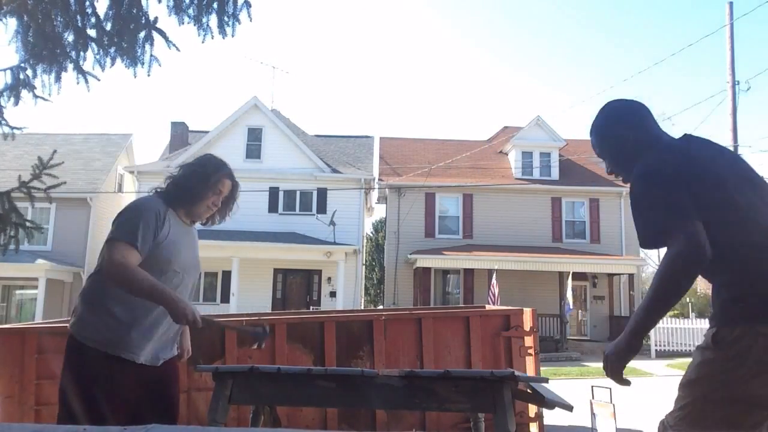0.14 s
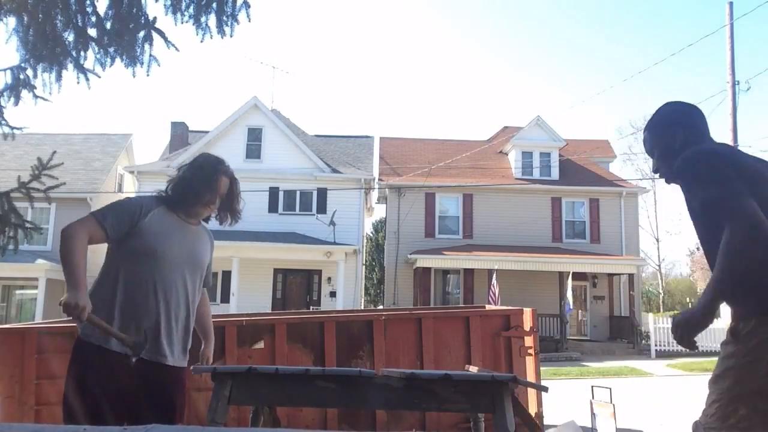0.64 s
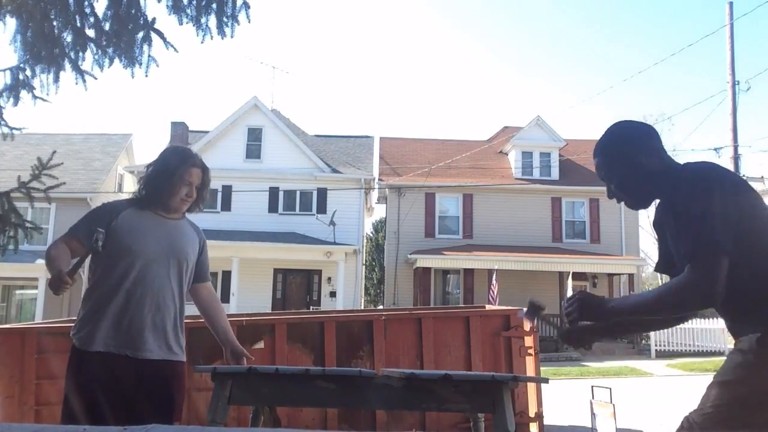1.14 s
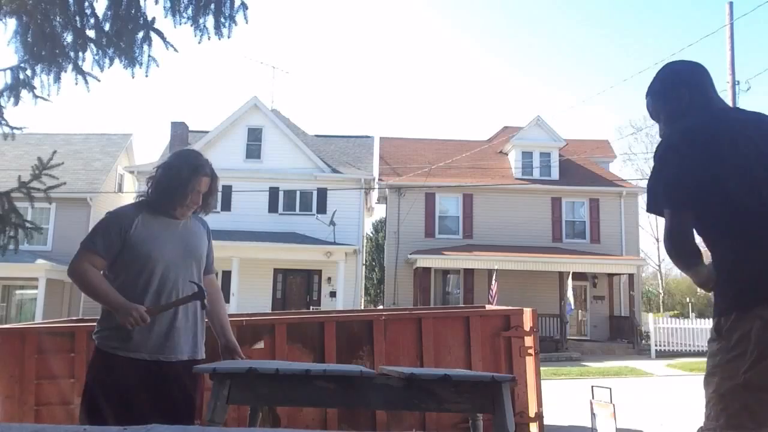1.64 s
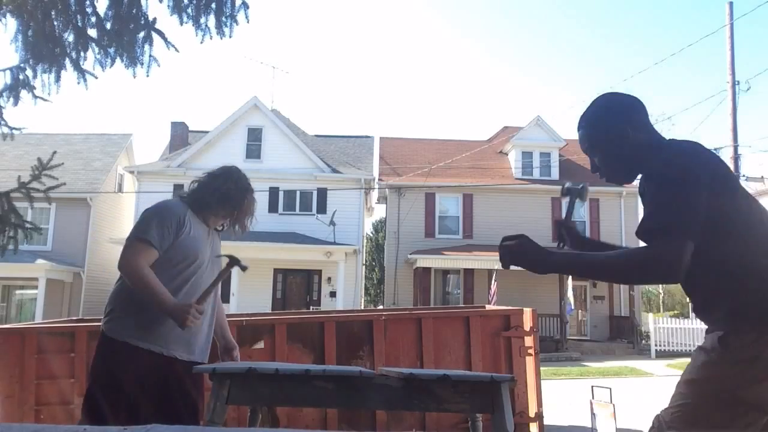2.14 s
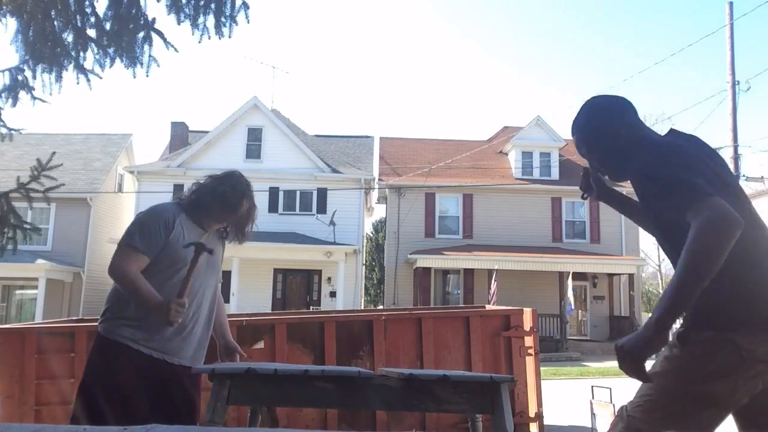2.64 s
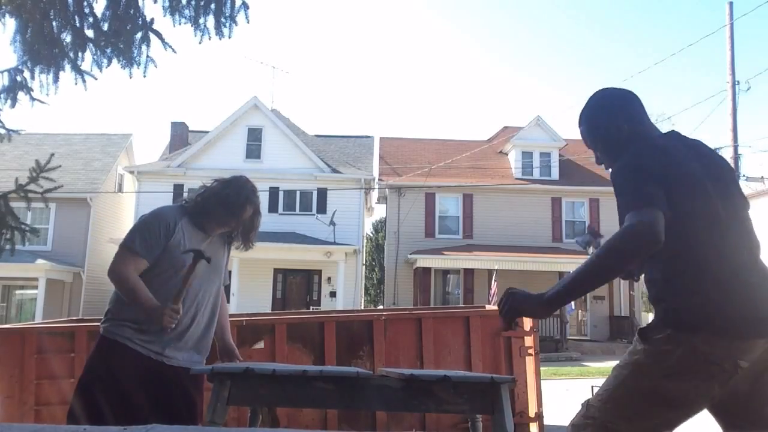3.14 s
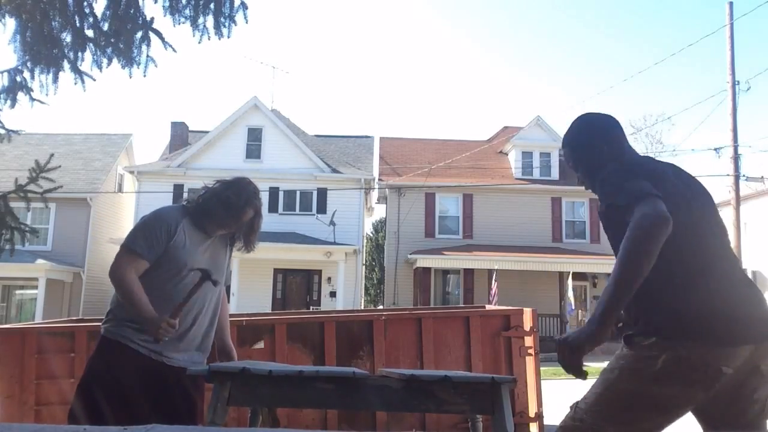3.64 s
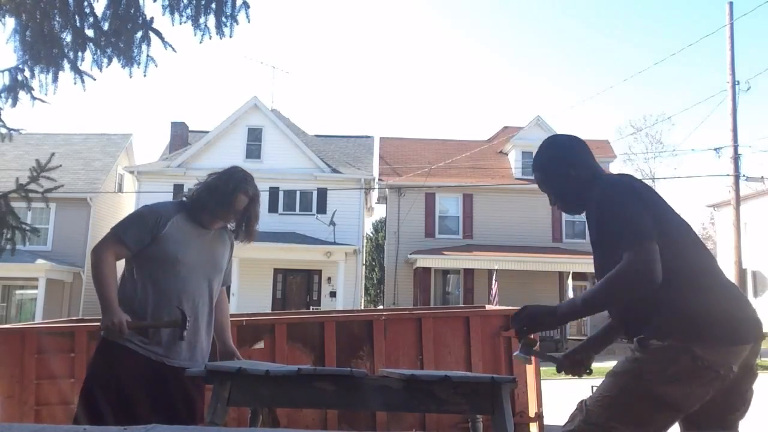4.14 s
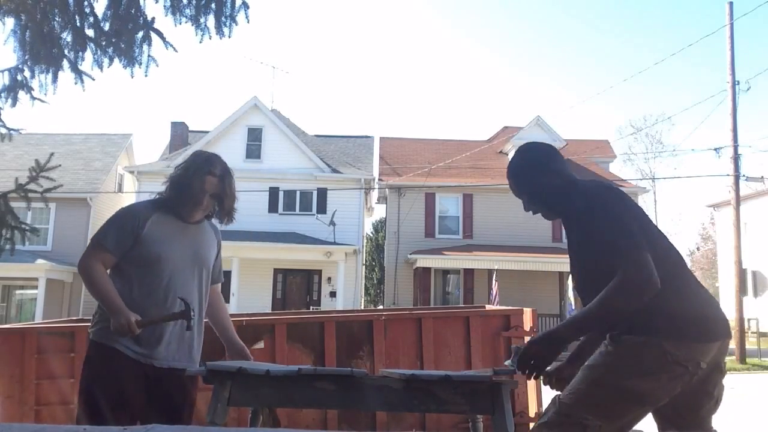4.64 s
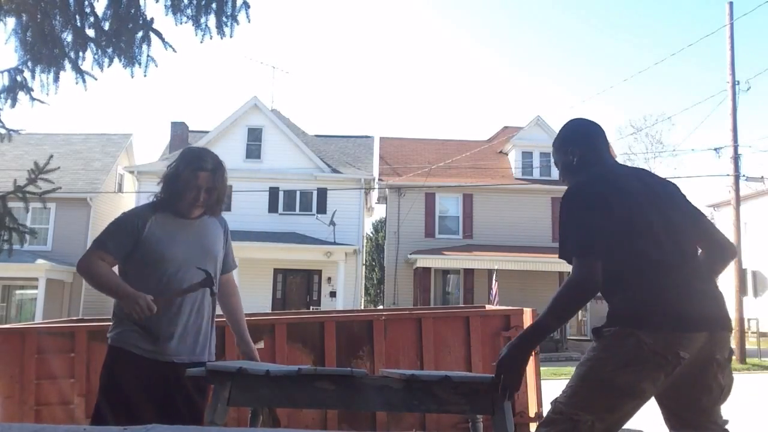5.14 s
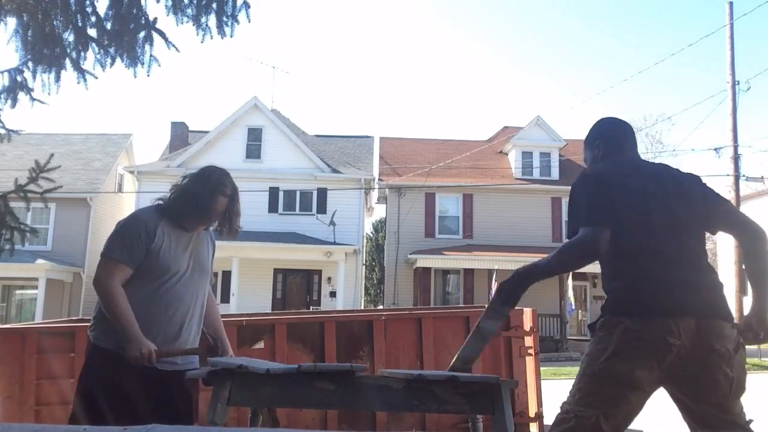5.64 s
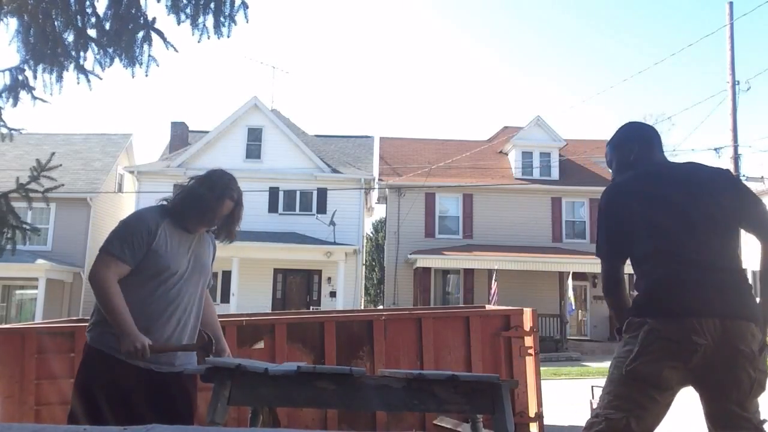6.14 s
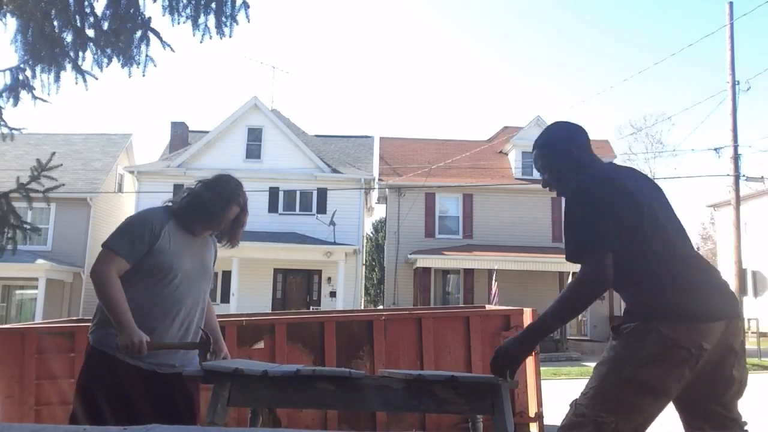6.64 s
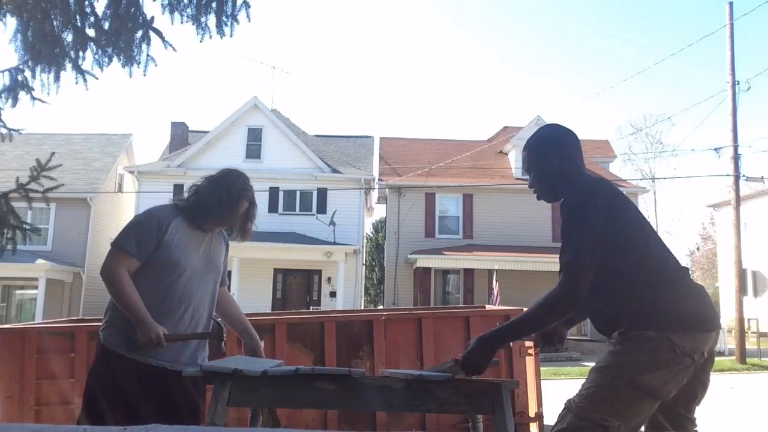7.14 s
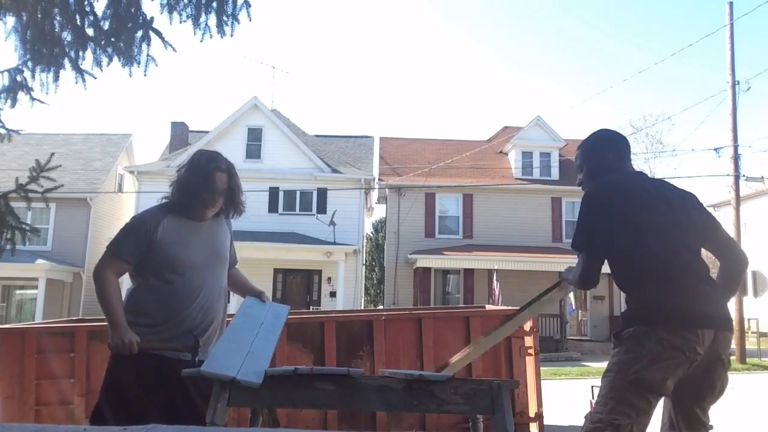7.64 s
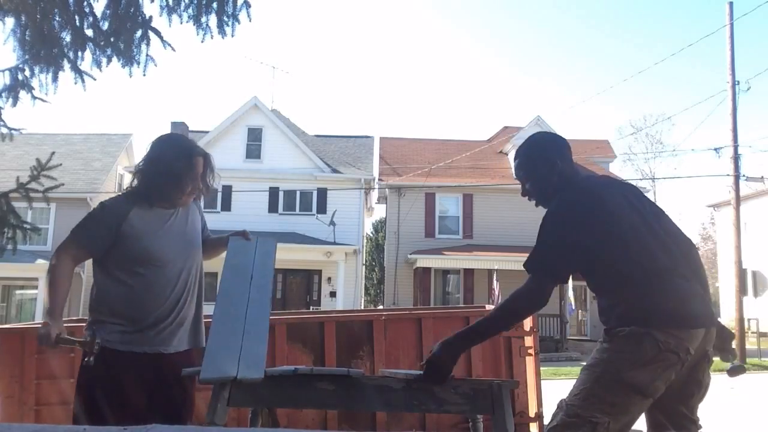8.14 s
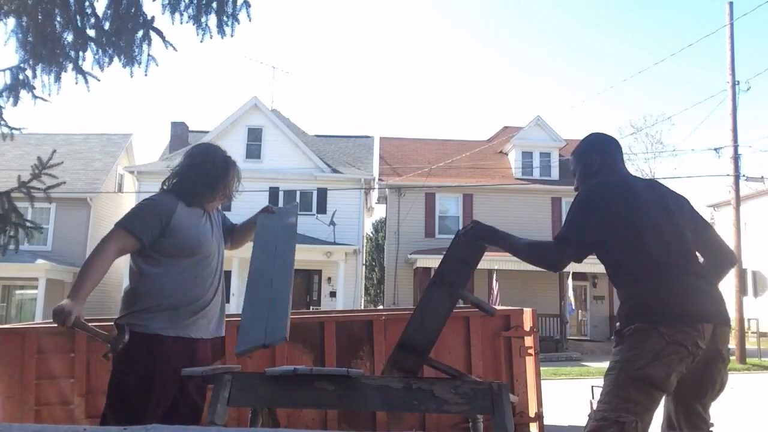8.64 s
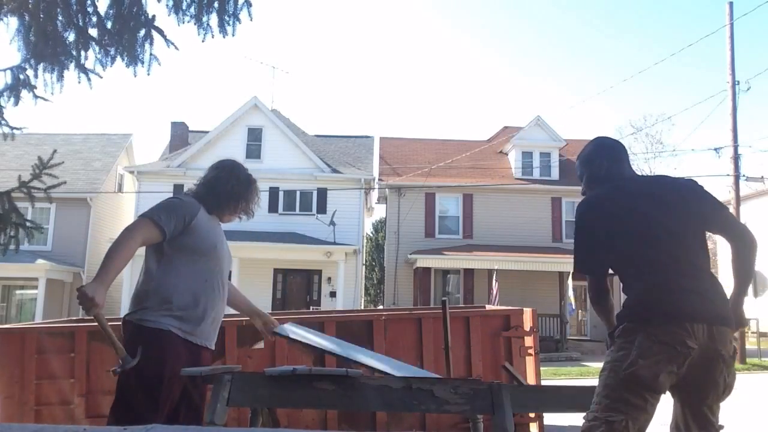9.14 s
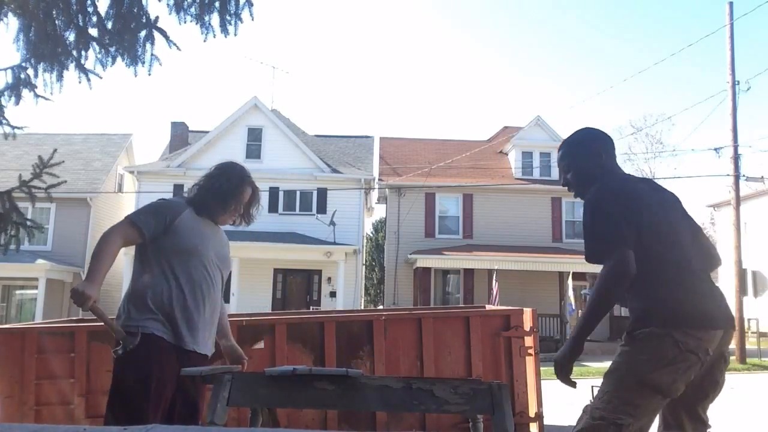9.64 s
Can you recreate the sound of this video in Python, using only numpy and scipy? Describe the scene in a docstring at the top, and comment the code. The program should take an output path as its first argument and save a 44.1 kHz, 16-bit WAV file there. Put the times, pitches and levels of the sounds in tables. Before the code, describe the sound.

Close microphone in a residential yard: irregular hammer knocks on old wood, bright and hard, some with a low frame boom or brief metallic ping. Boards bounce and clack between blows. Later only loose slats are heard, small taps and light rubbing, one heavy clap, then a dense tumbling clatter at the end. Quick echoes return from the walls, over faint distant traffic and wind buffeting.

```python
"""A yard between houses: hammers knock slats off a wooden bench; loose slats bounce, clatter and fall.
Each knock is a spray of contacts that cracks and rings wood modes; some blows ring steel, the frame booms.
Walls return the knocks as a swell of decaying noise echoes. Street hum and wind are filtered noise;
rubbing slats and clothes are clumped noise grains. The recorder limits the loudest blows."""
import sys
import numpy as np
from scipy import signal
from scipy.fft import rfft, irfft
from scipy.io import wavfile
from scipy.ndimage import uniform_filter1d

SR = 44100
rng = np.random.default_rng(int(sys.argv[2]) if len(sys.argv) > 2 else 0)


def boost_factor(decibels):
    """Convert a level in decibels to a linear amplitude factor."""
    exponent = np.asarray(decibels, float) / 20
    return 10 ** exponent


def to_wav(s):
    """Save 16-bit WAV."""
    ch = np.atleast_2d(s).T  # columns
    pcm = np.round(np.clip(ch, -1, 1) * 32767)  # PCM
    wavfile.write(sys.argv[1], SR, pcm.astype(np.int16))


N = 430416
LONG = 1 << 14  # samples in one knock or ring


def rms_one(x):
    """Scales to unit rms."""
    return x / np.sqrt(np.mean(x ** 2) + 1e-20)


def at_hz(points, hz):
    """Interpolates a (Hz, dB) curve over log frequency."""
    point_hz, point_db = np.transpose(points)
    return np.interp(np.log(hz + 1), np.log(point_hz), point_db)


def band(x, low_hz, high_hz):
    """Band-pass filter."""
    edges_hz = [low_hz, min(high_hz, 0.45 * SR)]
    return signal.sosfilt(signal.butter(2, edges_hz, "band", fs=SR, output="sos"), x)


def drift(rate_hz, size):
    """Random values of spread 1, joined by straight lines."""
    steps = rng.standard_normal(int(size * rate_hz / SR) + 2)
    return np.interp(np.arange(size) * rate_hz / SR, np.arange(len(steps)), steps)


def rings(modes, stretch):
    """Spectra of dying sines, one row per mode; stretch scales the pitches."""
    hz, db, t60_s = np.transpose(modes)[:, :, None]
    turn = 2 * np.pi * hz * stretch / SR
    r = boost_factor(-60 / (t60_s * SR))  # decay per sample
    z = np.exp(-2j * np.pi * np.arange(LONG // 2 + 1) / LONG)
    return boost_factor(db) * np.sin(turn) * z / (1 - 2 * r * np.cos(turn) * z + (r * z) ** 2)


def placed(shape, times_s, levels_db):
    """The shape at each time, scaled by its dB."""
    clicks = np.zeros(N)
    clicks[[round(s * SR) for s in times_s]] = boost_factor(levels_db)
    return signal.fftconvolve(clicks, shape)[:N]


# far traffic spectrum: (frequency [Hz], relative level [dB])
STREET_SPECTRUM = [(15, -36), (25, -28), (114, 11), (190, 5.5), (256, -13.5), (354, -1.5), (531, -4.5),
                   (1070, 3.5), (1520, -9), (1740, -5.5), (3500, -17.5), (7710, -30), (14000, -39),
                   (16000, -43)]
STREET_DB = -50


def street():
    """Far traffic: coloured noise that wavers a little."""
    hz = np.arange(N // 2 + 1) * SR / N
    noise = irfft(rfft(rng.standard_normal(N)) * boost_factor(at_hz(STREET_SPECTRUM, hz)), N)
    return boost_factor(STREET_DB + 1.9 * drift(1, N)) * rms_one(noise)


# wind on the microphone: (time [s], level [dB])
WIND_LEVELS = [(0.0, -55.5), (0.32, -51.5), (1.25, -46), (1.44, -57.5), (2.96, -53.5), (3.12, -63),
               (3.42, -70), (5.06, -52), (5.27, -45), (5.84, -57.5), (7.01, -48), (7.23, -38.5),
               (8.32, -50.5), (9.76, -48)]
DEEP_DB, GUST_DB = -6, -2  # the two parts, relative to the wind level
DEEP_LUMPS_DB, GUST_LUMPS_DB = 4.6, 4.5


def wind():
    """Lumpy rumble at the microphone port; gusts reach higher."""
    level_db = np.interp(np.arange(N) / SR, *np.transpose(WIND_LEVELS))
    white = rng.standard_normal((2, N))
    deep = boost_factor(DEEP_DB + DEEP_LUMPS_DB * drift(3.2, N)) * rms_one(band(white[0], 45, 110))
    gusts = boost_factor(GUST_DB + GUST_LUMPS_DB * drift(34, N)) * rms_one(band(white[1], 60, 420))
    return boost_factor(level_db) * (deep + gusts)


SPRAY_T60_S = 0.041
RATTLES, RATTLE_DB, RATTLE_S, RATTLE_T60_S = 6, -12, 0.07, 0.024


def contact_force(rise_s):
    """Noisy spray of contacts; loose wood touches again just after it."""
    t = np.arange(4096) / SR
    force = np.minimum(t / rise_s, 1) * boost_factor(-60 * t / SPRAY_T60_S)
    when, size = rng.random((2, RATTLES, 1))
    late = t - RATTLE_S * when
    rattle_db = RATTLE_DB - 10 * size - 17.7 * when - 60 * np.abs(late) / RATTLE_T60_S
    rattle = boost_factor(rattle_db) * (late > 0)
    grains = rng.standard_normal(len(t)) * boost_factor(3.62 * rng.standard_normal(len(t)))
    return (force + rattle.sum(axis=0)) * grains


# wood modes of the slats: (frequency [Hz], relative level [dB], t60 [s])
WOOD_MODES = [(336.5, -7, 0.1), (408, -4.5, 0.033), (554, -12, 0.017), (653, -3.5, 0.067), (720, -9, 0.096),
              (840, -37, 0.032), (990, -11.5, 0.091), (1071, -3.5, 0.078), (1130, -1, 0.02),
              (1253, 2.5, 0.012), (1430, 0, 0.019), (1550, 1.5, 0.036), (1745, -2, 0.027),
              (1856, -21, 0.059), (2154, -12, 0.041), (2430, -9.5, 0.069), (2921, -2.5, 0.023),
              (3580, -3.5, 0.028), (4226, -8, 0.021)]
WOOD_DB, MODE_SPREAD_DB, SLAT_SPREAD = -30.5, 3.5, 0.01  # SLAT_SPREAD: fraction of pitch
FAVOUR_DB, FAVOUR_OCTAVES = 9, 0.095


def struck_wood(spot_hz):
    """Wood spectrum: the struck spot favours modes near one pitch; no two slats are tuned alike."""
    chance = rng.standard_normal((3, len(WOOD_MODES)))
    away_octaves = np.log2(np.array(WOOD_MODES)[:, 0] / spot_hz)
    favour = np.exp(-(away_octaves / FAVOUR_OCTAVES) ** 2)
    strengths_db = WOOD_DB + FAVOUR_DB * favour + MODE_SPREAD_DB * chance[0]
    strengths = boost_factor(strengths_db) * np.sign(chance[1])
    return strengths @ rings(WOOD_MODES, 1 + SLAT_SPREAD * chance[2, :, None])


# crack spectrum: (frequency [Hz], relative level [dB per Hz])
CRACK_SPECTRUM = [(35, -44), (60, -16.5), (469, -1), (1090, 6), (1380, -1.5), (2840, -8), (3120, -9.5),
                  (4200, -15), (7750, -29), (14600, -54.5), (16000, -53.5)]
CRACK_DB = 5  # relative to the wood


def knock(bass_db, tilt_db, spot_hz, rise_s):
    """One knock: contacts drive a broadband crack and the wood modes; unit rms over its first 14 ms."""
    hz = np.arange(LONG // 2 + 1) * SR / LONG
    crack = boost_factor(CRACK_DB + at_hz(CRACK_SPECTRUM, hz))
    low = 1 / (1 + (hz / 450) ** 4)
    octaves = np.log2(1 + (hz / 1800) ** 2) / 2
    small = hz ** 2 / (hz ** 2 + 70 ** 2)  # slats radiate little deep bass
    soft = 1 / (1 + (hz / 2500) ** 2)  # wood gives way: high modes are hardly driven
    lag = np.exp(-2j * np.pi * hz / SR * 64)  # 64 samples, room for the fade in
    hit = rfft(contact_force(rise_s), LONG)
    hit = hit / uniform_filter1d(np.abs(hit), size=40)  # all pitches driven fairly evenly
    colour = small * lag * boost_factor(bass_db * low + tilt_db * octaves)
    sound = irfft(hit * (crack + soft * struck_wood(spot_hz)) * colour)
    fade = np.interp(np.arange(LONG), [36, 64, LONG - 2048, LONG - 1024], [0, 1, 1, 0]) ** 2
    sound = sound * fade
    return sound / np.sqrt(np.mean(sound[64:700] ** 2))


# hammer blows: (time [s], level at microphone [dB], bass [dB], treble tilt [dB per octave],
# favoured pitch [Hz])
HAMMER_BLOWS = [(0.2654, -14, 0, 3.5, 620), (0.4562, -5, -4, 4.5, 1470), (1.2755, -7.5, -4, 4.5, 1040),
                (2.3181, -10.5, -6, 1.2, 900), (2.824, -13, 0.5, 4.5, 720), (2.955, -3, -12.5, 0.7, 1740),
                (3.3189, -7.5, -3.5, 4, 1310), (3.5357, -9, -9.5, -0.1, 940), (3.8058, -10, -7.5, 2.5, 692),
                (4.1083, -10, -10.5, 3, 990), (4.6773, -6.5, -7.5, 0.3, 940), (5.7271, -7, -5, 2.9, 658),
                (6.1881, -6, -6.5, 4, 915), (6.643, -7, 0.5, 8, 1010), (7.0416, -13, -8, -1, 990)]
# slats rebound, clatter and fall: (time [s], level [dB], treble tilt [dB per octave],
# echo above the knock [dB], favoured pitch [Hz])
SLAT_CLATTER = [(0.2995, -17, -14, -6, 1080), (0.3456, -22, 0, -2, 1130), (0.6496, -28, -12, 4, 720),
                (0.818, -54.5, 17, -8, 990), (0.939, -14.5, -2.5, -8, 1150), (1.056, -33, -26, -18, 1000),
                (1.3042, -20.5, 4, -21, 1120), (1.7212, -13, 0, -2.5, 1040), (1.8153, -23, -3, 4, 1050),
                (1.8685, -13, 0.5, 1, 1010), (2.0385, -43.5, -40, 0, 1010), (2.3356, -12, 4.5, 10, 910),
                (3.3454, -9.5, -8, -2.5, 1240), (3.6623, -32, -6, -3, 990), (3.851, -14, -4, -2.5, 1560),
                (4.1378, -13.5, -6, 5.5, 960), (5.1671, -28, -19, 0, 870), (5.2611, -24.5, -10, 0, 650),
                (5.3565, -28, -42, 8.5, 1010), (5.424, -24.5, -14, -7.5, 1070), (5.58, -42, 25, 10.5, 1050),
                (5.6216, -42.5, 6, -2, 1010), (5.665, -27.5, 2, 7.5, 990), (5.6816, -12.5, -15, 4, 1070),
                (6.3139, -16.5, -2.5, 3.5, 1070), (6.407, -25, -7, 1, 1550),
                (6.7478, -16.5, -11, 0.5, 1070), (7.3628, -17, -4, 1, 1060), (7.4656, -30.5, -20, -6, 940),
                (7.985, -48.5, 11, 15.5, 1090), (8.0722, -7.5, -2.5, -3.5, 1720),
                (8.3074, -29.5, -19, -5, 1070), (8.3222, -28.5, -8, 6, 1080),
                (8.3531, -29.5, -5.5, -1, 700), (8.456, -26.5, -8.5, 1, 610),
                (8.4665, -30.5, -8, 4.5, 1050), (8.5775, -37, -13, -6, 1020),
                (8.6299, -27.5, -11, -25, 1550), (8.6625, -22.5, -27, -29, 1020),
                (8.6845, -17, -12, -30, 1500), (8.7382, -36.5, -30, -14, 637),
                (8.8153, -43.5, -7, 11.5, 1040), (9.0269, -27.5, 12.5, -15, 1710),
                (9.0555, -18.5, -3.5, -6, 1530), (9.1285, -30.5, -1.5, -7, 1020),
                (9.155, -31.5, -2, 5, 1030), (9.1876, -13.5, 7.5, -5.5, 986), (9.4025, -16, 7.5, 4, 1150),
                (9.4096, -8.5, 6.5, -3.5, 1520), (9.4219, -22, 12, 7, 1430), (9.5223, -13.5, 8, -1.5, 630),
                (9.6022, -27, -12, 5.5, 1100), (9.644, -24.5, 3, 5, 720), (9.6539, -21.5, 1.5, 5, 1460),
                (9.7077, -20.5, -3.5, 3.5, 1080)]
BLOW_ECHO_DB = -1.5  # every blow sends the same strength into the yard
SLAT_BASS_DB = -8  # a loose slat has less body than the bench
BLOW_RISE_S, SLAT_RISE_S = 0.001, 0.0028  # a slat lands edge first, less sharply than steel


def knocks():
    """All blows and slat hits: the direct sound, and what each sends out to the walls."""
    near, sent = np.zeros((2, N + LONG))
    rows = [(s, db, bass_db, tilt_db, BLOW_ECHO_DB - db, spot_hz, BLOW_RISE_S)
            for s, db, bass_db, tilt_db, spot_hz in HAMMER_BLOWS]
    rows += [(s, db, SLAT_BASS_DB, tilt_db, echo_db, spot_hz, SLAT_RISE_S)
             for s, db, tilt_db, echo_db, spot_hz in SLAT_CLATTER]
    for s, level_db, bass_db, tilt_db, echo_db, spot_hz, rise_s in rows:
        sound = boost_factor(level_db) * knock(bass_db, tilt_db, spot_hz, rise_s)
        i = round(s * SR) - 70  # makes up for the lag
        near[i:i + LONG] += sound
        sent[i:i + LONG] += boost_factor(echo_db) * sound
    return near[:N], sent[:N]


# heaviest knocks shake the frame: (time [s], boom [dB], thud [dB], air puff [dB])
HEAVY_BOOMS = [(0.268, -16.5, -49, -42), (2.319, -21, -25, -41), (4.668, -46, -24, -32.5),
               (7.042, -38, -31, -55), (8.071, -32.5, -18, -55), (9.52, -42, -21.5, -55)]
USUAL_BOOM_DB, USUAL_THUD_DB, USUAL_PUFF_DB = -44.5, -34, -67  # any hammer blow
BOOM_HZ, BOOM_T60_S = 134.3, 0.36
THUD_HZ, THUD_T60_S = 173.4, 0.11
BOOM_RISE_S, PUFF_S = 0.018, 0.011


def frame():
    """Bench frame booms up slowly, legs thud on the ground, a soft push of air comes with them."""
    t = np.arange(LONG) / SR
    usual = [(s, USUAL_BOOM_DB, USUAL_THUD_DB, USUAL_PUFF_DB) for s, *_ in HAMMER_BLOWS]
    times_s, boom_db, thud_db, puff_db = np.transpose(usual + list(HEAVY_BOOMS))
    modes = [(BOOM_HZ, 0, BOOM_T60_S), (THUD_HZ, 0, THUD_T60_S)]
    boom, thud = 2 * (1 - np.exp(-t / BOOM_RISE_S)) * irfft(rings(modes, stretch=1))
    puff = (1 - t / PUFF_S) * t / PUFF_S * np.exp(2 - t / PUFF_S)
    return placed(boom, times_s, boom_db) + placed(thud, times_s, thud_db) + placed(puff, times_s, puff_db)


# yard echoes by band: (centre [Hz], near walls relative level [dB], near t60 [s],
# far street relative level [dB], far t60 [s])
WALL_BANDS = [(89.5, 2, 0.33, -28, 1.2), (172, 7, 0.27, -46, 1), (410, 0.5, 0.31, -37, 0.64),
              (762, -1, 0.26, -30, 0.86), (1590, -2.5, 0.28, -27.5, 1.53), (3110, -7.5, 0.14, -17.5, 0.66),
              (5330, -8, 0.27, -43, 1.7), (10400, 0.5, 0.13, -38, 0.81)]
ECHO_DB, FIRST_ECHO_S, SWELL_S, LUMPY_DB = -31.5, 0.0059, 0.013, 2


def yard(x):
    """Echoes start after a gap, swell in lumps and die by band: fast off near walls, slowly off the street."""
    t = np.arange(int(1.2 * SR)) / SR
    swell = np.clip((t - FIRST_ECHO_S) / SWELL_S, 0, 1) * boost_factor(LUMPY_DB * drift(114, len(t)))
    echoes = 0
    for hz, near_db, near_t60_s, far_db, far_t60_s in WALL_BANDS:
        dying = boost_factor(near_db - 60 * t / near_t60_s) + boost_factor(far_db - 60 * t / far_t60_s)
        noise = band(rng.standard_normal(len(t)), hz / np.sqrt(2), hz * np.sqrt(2))
        echoes = echoes + dying * noise
    return boost_factor(ECHO_DB) * signal.fftconvolve(x, swell * echoes)[:N]


# hammer head modes: (frequency [Hz], relative level [dB], t60 [s])
STEEL_MODES = [(7400, -3, 0.065), (10070, -6.5, 0.063), (13400, -12, .04), (14100, -11, .06)]
# blows on a nail head, the steel sings: (time [s], level [dB])
STEEL_SINGS = [(0.4543, -21), (1.2784, -45), (2.336, -39.5), (2.9558, -24)]


def steel():
    """The hammer head rings at a few high modes."""
    ring = irfft(rings(STEEL_MODES, stretch=1).sum(axis=0))
    return placed(ring, *np.transpose(STEEL_SINGS))


# slats and clothes rub: (loudest time [s], level [dB], rise [dB per s], fall [dB per s])
RUBS = [(7.374, -63.5, 198, 28), (8.65, -66, 43, 18), (9.036, -47.5, 297, 158)]


def rustle():
    """Rubbing: fine noise grains that come in clumps."""
    t = np.arange(N) / SR
    gain = sum(boost_factor(db - np.maximum(rise * (s - t), fall * (t - s))) for s, db, rise, fall in RUBS)
    clumps_db = 4 * rng.standard_normal(N) + 4 * drift(40, N)
    grains = rng.standard_normal(N) * boost_factor(clumps_db)
    return gain * rms_one(band(grains, 2300, 7900))


def scene():
    """Sums all layers; knocks and steel also excite the yard."""
    near, sent = knocks()
    ring = steel()
    echoes = yard(sent + boost_factor(-2) * ring)
    return (street() + wind() + near + frame() + echoes + ring + rustle())[None]


def band_limit(x):
    """A steep low-pass at the top of the band."""
    return signal.sosfilt(signal.butter(12, 16470, fs=SR, output="sos"), x)


CEILING_DB, RELEASE_DB_PER_S, TOP_CUT_HZ = -1.5, 328, 16000


def record(dry):
    """Quick limiter holds loud blows near the ceiling; what slips past is clipped, then the top is cut."""
    slope_db = RELEASE_DB_PER_S * np.arange(N) / SR
    over_db = np.maximum(20 * np.log10(np.abs(dry) + 1e-9) - CEILING_DB, 0)
    held_db = np.maximum.accumulate(over_db + slope_db, axis=1) - slope_db
    held_db = signal.lfilter([0.05], [1, -0.95], held_db)  # attack of about 20 samples
    limited = np.clip(dry * boost_factor(-held_db), -0.98, 0.98)
    top_cut = signal.cheby2(16, 40, TOP_CUT_HZ, fs=SR, output="sos")
    mix = signal.sosfilt(top_cut, limited)
    return band_limit(mix)


dry = scene()
out = record(dry)
to_wav(out)
```